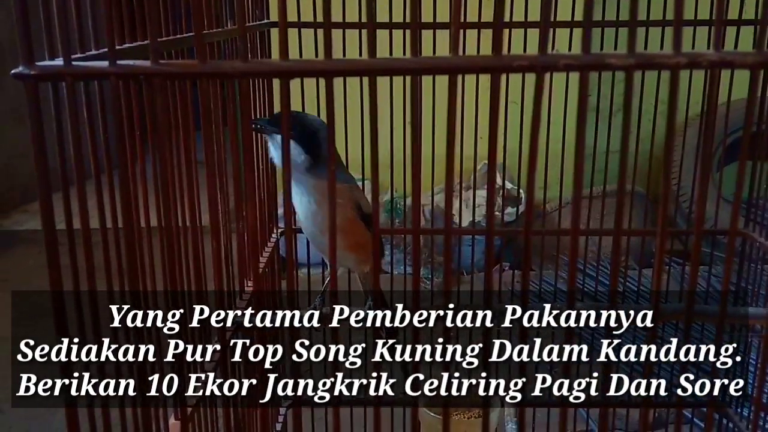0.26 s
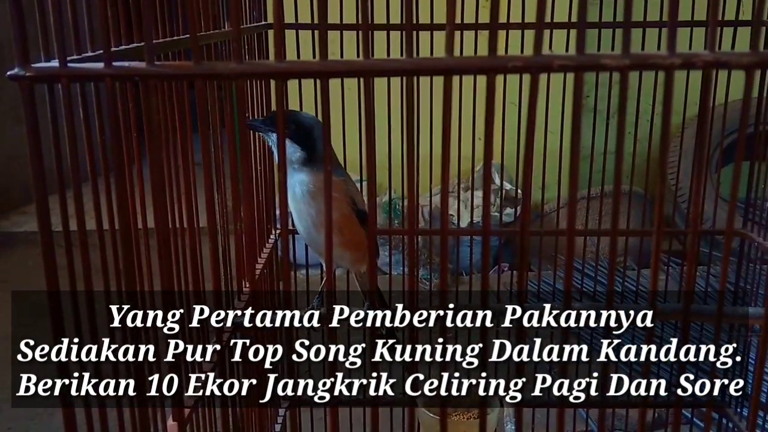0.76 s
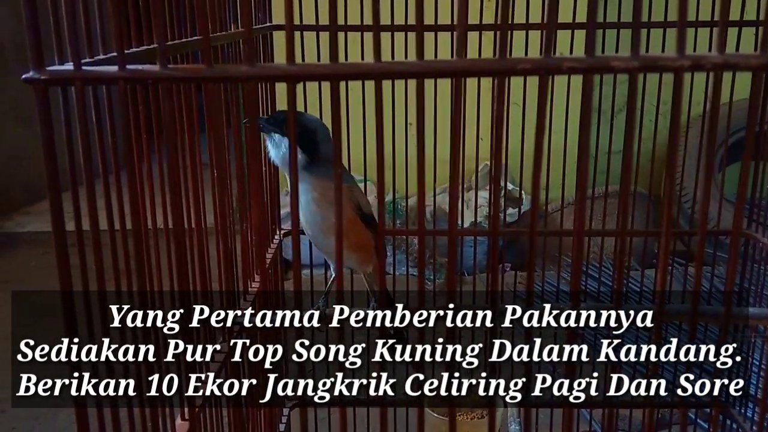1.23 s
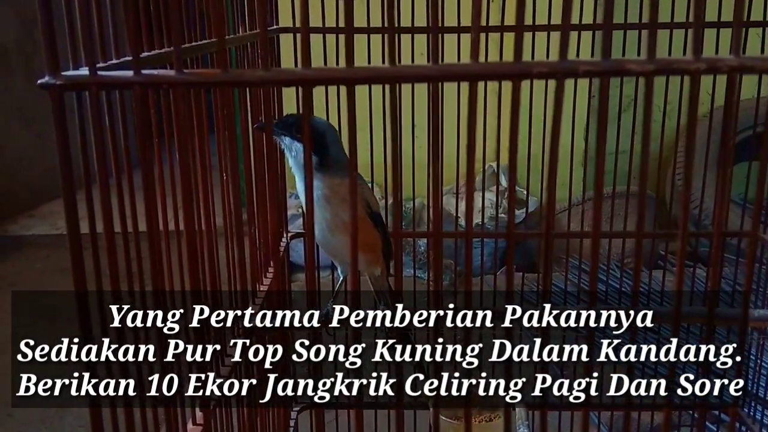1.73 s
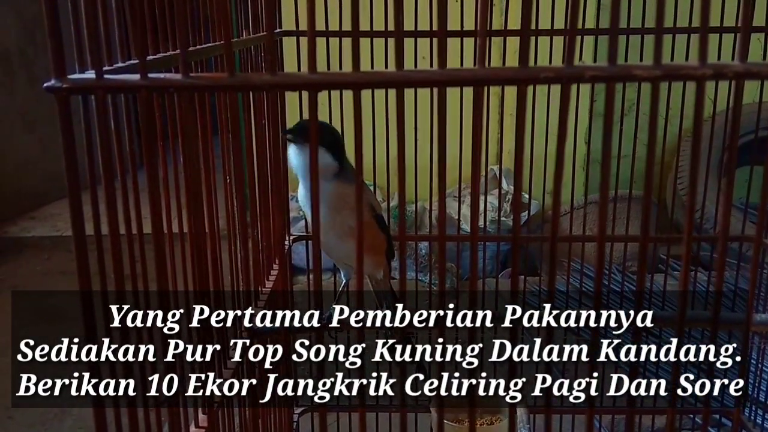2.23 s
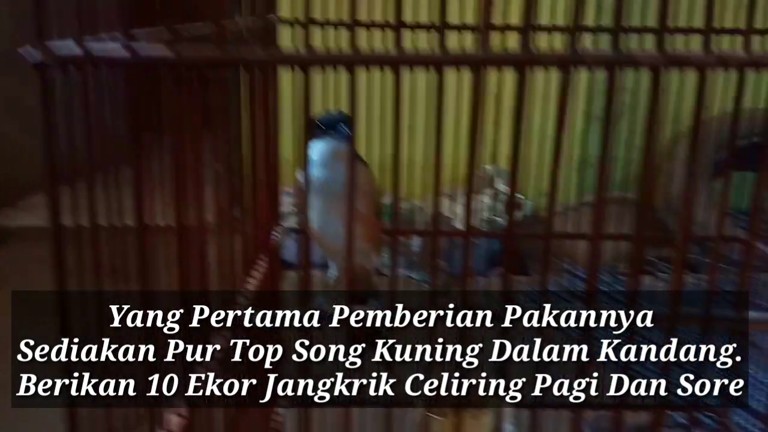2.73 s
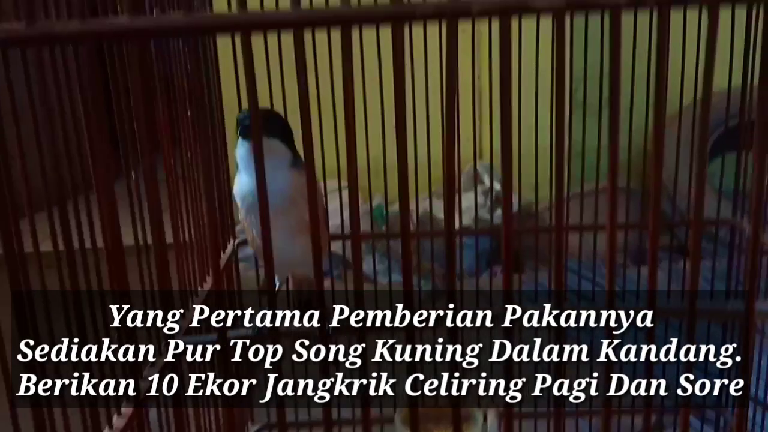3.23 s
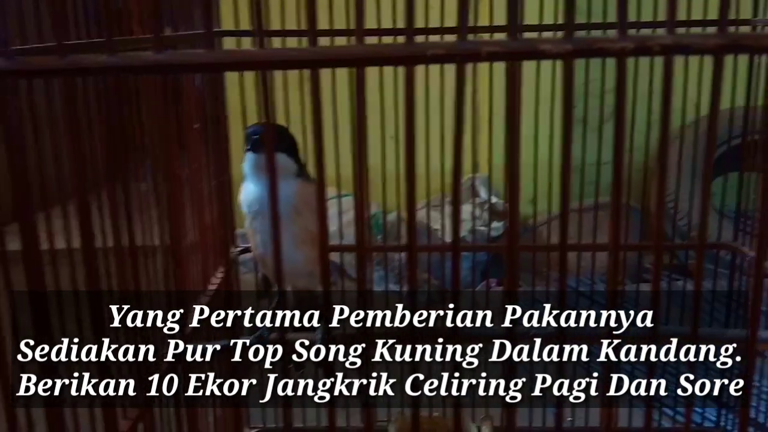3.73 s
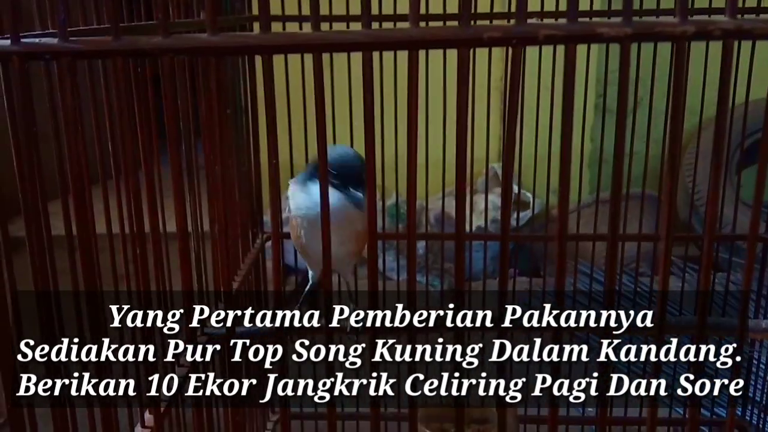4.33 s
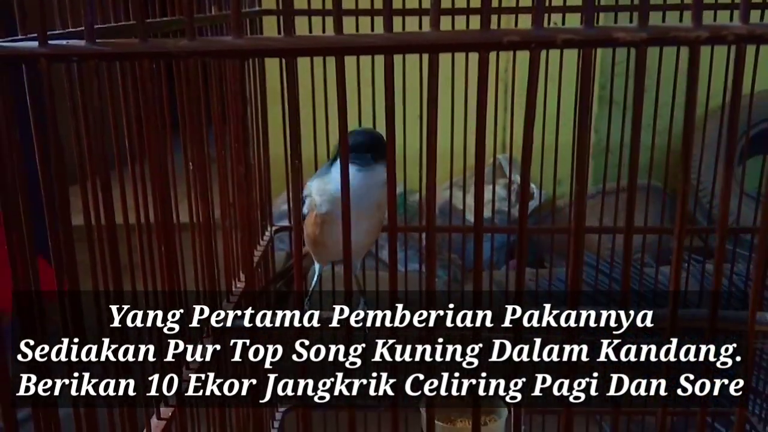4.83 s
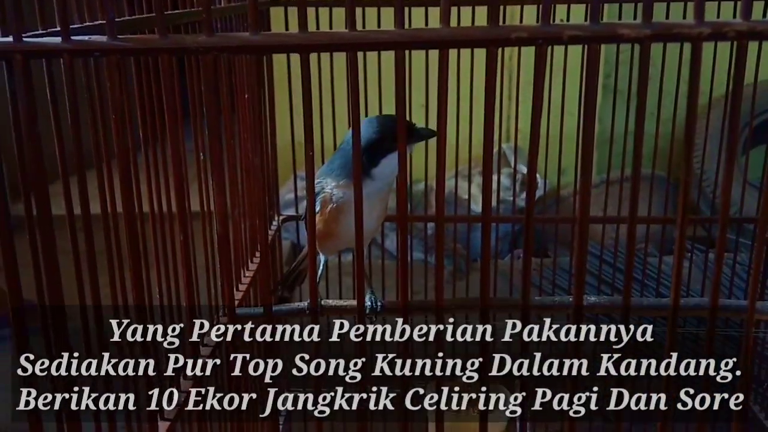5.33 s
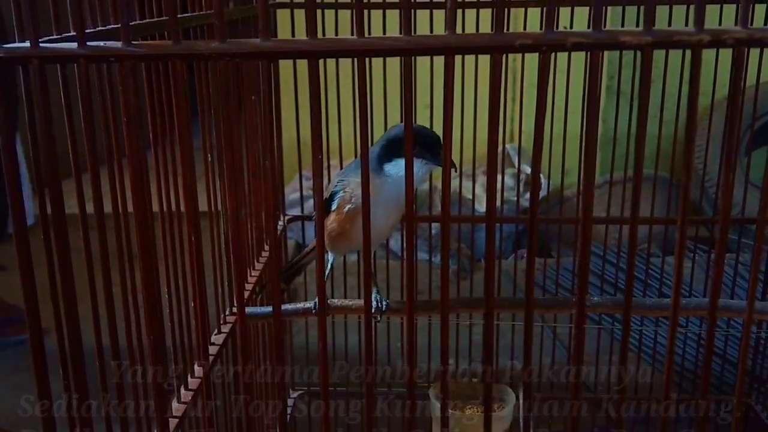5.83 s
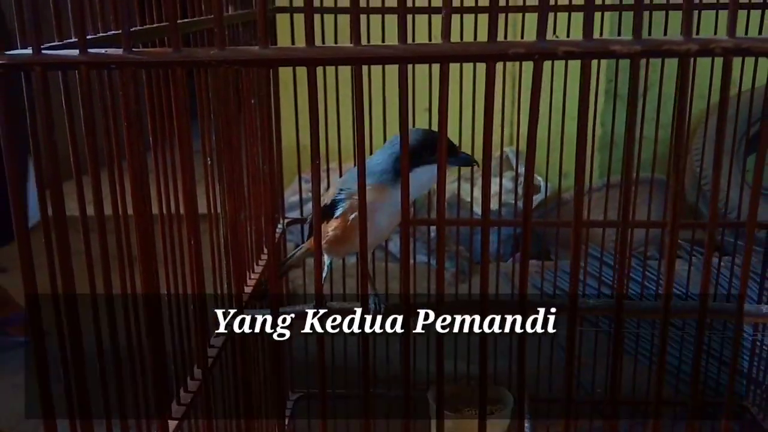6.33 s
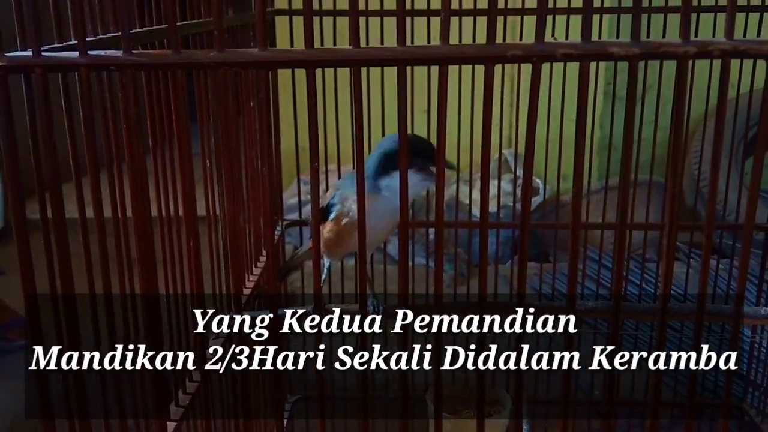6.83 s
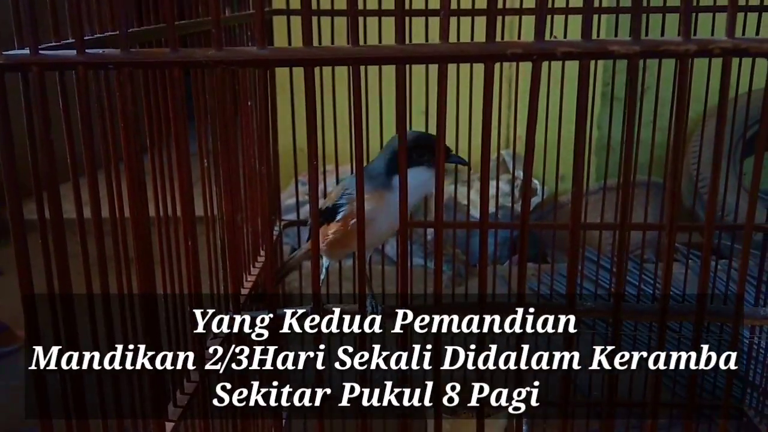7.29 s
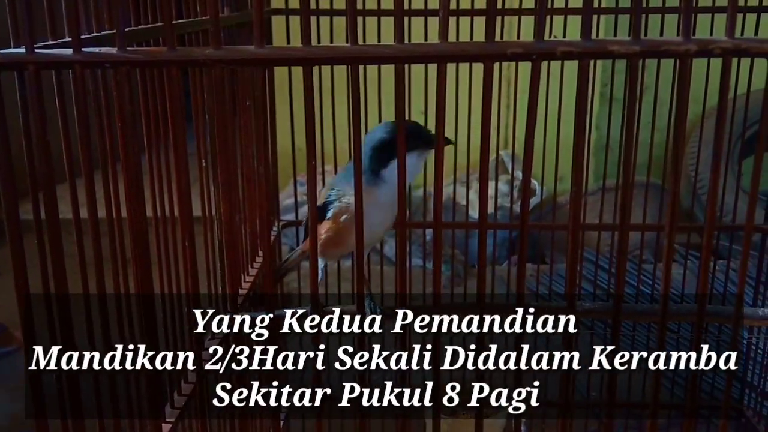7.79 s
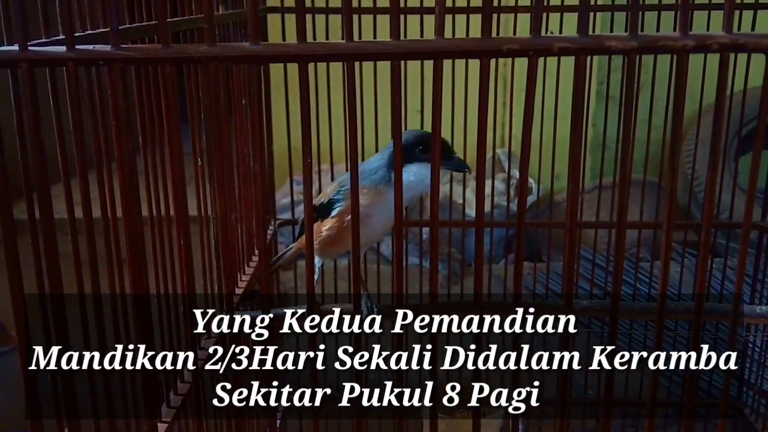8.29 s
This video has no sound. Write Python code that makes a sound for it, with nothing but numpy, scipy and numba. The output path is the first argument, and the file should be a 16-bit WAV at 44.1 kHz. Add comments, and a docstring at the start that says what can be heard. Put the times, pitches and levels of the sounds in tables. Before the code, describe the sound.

A caged shrike calls very close to a phone in a hard-walled room with steady low rumble. Four separated falling notes with scratchy tails come first, with distant whistles, chirps and harsh rasps between them. The wooden cage thuds and its bars rattle, then ten short nasal arched calls follow at fairly regular intervals, with a few thin high pips. The rumble dips under each loud call.

```python
"""A hard-walled room with a low rumble: a caged shrike calls close to a phone's microphone.
It gives four falling notes with scratchy tails, then ten arched, nasal ones: a buzz through a moving throat resonance.
Further off, gliding tones whistle and chirp and smeared tones rasp; noise bursts jolt the cage; thin pips come nearer.
The phone's gain control ducks the room's rumble under each call, and a limiter flattens the loudest notes."""
import sys
import numpy as np
from scipy import signal
from scipy.fft import rfft, irfft, next_fast_len
from scipy.io import wavfile
from numba import njit

SR = 44100
rng = np.random.default_rng(int(sys.argv[2]) if len(sys.argv) > 2 else 0)


def dump(signal):
    """Clip the signal to [-1, 1] and save it as 16-bit WAV at the path in sys.argv[1]."""
    limited = np.clip(np.atleast_2d(signal).T, -1, 1)
    pcm = np.round(limited * 32767).astype(np.int16)
    wavfile.write(sys.argv[1], SR, pcm)


N = 377055
TIME = np.arange(N) / SR

# Levels of single sounds are source levels, ahead of distance, room and gain control; spectra are relative.
# rumble of the surroundings: [f/Hz, level/dB]
RUMBLE_SPECTRUM = [(18, -40), (32, -26), (42, -5), (51, -7), (66, -2.5), (160, -0.5), (260, -6),
                   (420, -2.5), (780, -7.5), (1300, -14), (2400, -18.5), (4200, -21), (5700, -21.5),
                   (7000, -31), (10000, -37.5), (15000, -61)]
RUMBLE_DB = -26
# wavering hum tones: [centre f/Hz, level/dB]
HUM_TONES = [(68, -44), (134, -40.5), (190, -34), (339, -44), (560, -55.5)]
# short falling slurs of a bird further off: [t/s, length/s, level/dB]
SLURS = [(0, .02, -22.5), (.051, .058, -21), (0.513, .035, -20), (0.702, .054, -22.5), (0.898, .06, -20)]
# pitch of every slur: [first f/Hz, middle f/Hz, last f/Hz]
SLUR_HZ = (3454, 2950, 2480)
# the same bird's chirps: [t/s, level/dB]
CHIRPS = [(0.129, -9), (.481, -11.5)]
# a chirp's upstroke, thin top note and loud downstroke:
# [delay/s, length/s, first f/Hz, middle f/Hz, last f/Hz, level/dB added to the chirp's]
CHIRP_STROKES = [(0, 0.017, 3140, 4100, 5400, -8), (.004, 0.038, 5960, 6440, 6300, -7),
                 (0.026, 0.039, 5240, 4550, 4320, 1)]
# soft rustles: [t/s, length/s, level/dB]
RUSTLES = [(0.045, 0.18, -24)]
# scratch of turbulent air in a rough note: [f/Hz, level/dB]
SCRATCH_SPECTRUM = [(800, -31), (2000, -24), (3100, 5), (4700, 5), (7000, -5), (9800, -4), (11600, -7.5),
                    (13500, -22), (15200, -11.5), (16500, -37)]
# level of the syrinx's harmonics before the throat: [f/Hz, level/dB]
SYRINX_SPECTRUM = [(900, 0.5), (1700, -3), (2400, -1.5), (3700, -2), (4600, -1), (5200, 2), (6000, -2),
                   (7500, -1), (9500, -6)]
# smeared high overtones: [multiple of the pitch, level/dB]
SIZZLE_PARTS = [(9.8, 0.5), (12.9, -2)]
# falling notes: [t/s, tone length/s, whole length/s, nominal pitch f/Hz, level/dB, tail level/dB re the tone,
# throat resonance as a multiple of the pitch]
FALLING_NOTES = [(0.195, .105, 0.23, 1136, 2, -12.5, 2.76), (1.082, 0.1, 0.22, 1126, 3, -10.5, 3.06),
                 (2.159, .096, .225, 1142, -1, -6.5, 3.02), (3.003, 0.095, .22, 1106, 2, -11, 3.17)]
# harsh calls from further off: [t/s, length/s, first f/Hz, last f/Hz, level/dB, fullest at share of the length]
RASPS = [(0.844, 0.39, 4130, 3220, -18, 0.27), (1.436, 0.44, 3678, 2987, -18.5, 0.26),
         (3.664, 0.63, 3248, 3106, -20.5, 0.045), (5.649, 0.36, 3450, 2975, -26, 0.32),
         (6.562, 0.33, 2830, 2613, -29.5, 0.2), (7.487, 0.14, 2410, 2310, -27, 1)]
# hiss around a harsh call: [f/Hz, level/dB]
RASP_HISS_SPECTRUM = [(1500, -26), (2600, -11), (3100, -1.5), (4200, -3), (5200, -18.5), (6200, -10.5),
                      (7500, -28), (11000, -23.5), (12600, -41)]
# jolts of the cage: [t/s, frame thud level/dB, bar rattle level/dB, decay/s, thud tilt/dB per octave]
JOLTS = [(2.432, -10, -10, 0.074, 2), (2.462, -2.5, -5.5, 0.06, 6), (2.608, -15.5, -34, 0.086, -14),
         (2.724, -8.5, -10.5, 0.061, -4), (2.755, -2.5, -8.5, 0.064, -6), (2.856, -11.5, -39, 0.084, -19),
         (2.965, -12, -20, 0.042, -5), (3.232, -18, -17.5, 0.03, 1)]
# resonances of the cage's wooden frame: [f/Hz, width/Hz, level/dB]
FRAME_MODES = [(79.6, 18, -7), (141, 27, 12), (201, 57, 12), (343, 100, 6), (532, 39, 6.5), (850, 39, -10),
               (1190, 120, -32)]
# rattle of the cage's bars: [f/Hz, level/dB]
BAR_SPECTRUM = [(400, -7.5), (700, -23), (1400, -16.5), (1900, -17), (2300, -8), (2900, -11), (3900, -6.5),
                (5200, -12.5), (7500, -17), (10000, -26), (12000, -53), (15500, -52)]
# arched notes: [t/s, crest after t/s, hold past the crest/s, whole length/s, nominal pitch f/Hz, level/dB,
# tail level/dB re the tone, first throat f/Hz, widest throat f/Hz, roughness of the tone 0-1]
ARCHED_NOTES = [(4.058, 0.077, 0.017, 0.19, 1179, -4, -6.5, 2426, 4240, 0.31),
                (4.522, 0.082, .03, .2, 1203, -4.5, -5.5, 2344, 4440, 0.41),
                (4.887, 0.075, 0.027, .175, 1106, -2.5, -14, 3080, 3960, 0.28),
                (5.479, .078, 0.024, .2, 1201, -3.5, -6.5, 2330, 4300, 0.32),
                (5.95, 0.083, .028, .2, 1195, -4.5, -7.5, 2280, 4285, 0.35),
                (6.38, 0.081, 0.027, .175, 1138, -3.5, -7.5, 3080, 4050, 0.25),
                (6.782, 0.073, .028, .175, 1098, -3, -10.5, 2965, 3865, .2),
                (7.205, .076, 0.036, 0.19, 1151, -4.5, -13, 2444, 4430, 0.27),
                (7.594, .081, 0.031, .18, 1137, -3, -11.5, 2666, 4270, 0.24),
                (8.179, 0.079, 0.025, .2, 1168, -3.5, -5, 2360, 4270, 0.19)]
# thin, pure pips from a nearer bird: [t/s, length/s, first f/Hz, middle f/Hz, last f/Hz, level/dB]
PIPS = [(4.85, 0.04, 5640, 6060, 5880, -20), (4.98, 0.12, 5900, 5780, 5810, -27.5),
        (5.126, 0.044, 5300, 5490, 5740, -17.5), (5.242, 0.0445, 5280, 5370, 5450, -16),
        (5.33, 0.041, 5260, 5340, 5470, -15.5)]
# first bounces off the cage's tray and bars, some inverted: [delay/s, signed gain]
BOUNCES = [(.00164, -.08), (.00194, -.15), (.00253, -.12), (.00311, .08), (.0054, .13), (.00637, -.12)]

# a falling note starts sharp, settles and keeps sagging (shares of the pitch)
FALL_FLICK, FALL_SETTLE_S, FALL_SAG_PER_S = .22, .021, 1.05
FALL_SAG_FROM_S = .04  # where the sag passes the nominal pitch
FALL_TAIL_THROAT_HZ = 2624
FALL_THROAT_RISE = .1  # added to the throat's multiple at the harsh start, as a share
# an arched note flicks down, lifts with the opening beak and sags after its hold (shares of the pitch)
ARCH_FLICK, ARCH_SETTLE_S, ARCH_LIFT, ARCH_SAG_PER_S = .42, .015, 0.11, 3.8
# the beak opens and shuts around the crest; the note swells with it
OPEN_S, SHUT_S, SHUT_THROAT_HZ, SWELL_DB = .036, .04, 2220, 10
# just past the crest the voice catches and turns hoarse
CATCH_S, CATCH_WIDTH_S, CATCH_DB = .013, 0.0044, -11.5
FULL_SCALE, TOP_HZ = .72, 15500  # the phone's limiter ceiling and upper band edge


def undb(db):
    """Decibels to gain."""
    return 10 ** (np.asarray(db) / 20)


def unit(x):
    """Scale to rms 1."""
    return x / np.sqrt(np.mean(x ** 2) + 1e-18)


def add(out, s, x):
    """Mix x into out from time s."""
    i = max(int(s * SR), 0)
    out[i:i + len(x)] += x[:N - i]


def gain_at(points, hz):
    """Read a (f/Hz, level/dB) spectrum as gain."""
    f, db = np.transpose(points)
    return undb(np.interp(np.log(hz + 1), np.log(f), db))


def colour(x, points):
    """Filter by a (f/Hz, level/dB) spectrum."""
    gain = gain_at(points, np.fft.rfftfreq(len(x), 1 / SR))
    return irfft(rfft(x) * gain, len(x))


def wobble(n, hz):
    """Random motion of spread about 1, mostly slower than hz."""
    size = next_fast_len(n + 2000, True)
    f = np.fft.rfftfreq(size, 1 / SR)
    spectrum = rfft(rng.standard_normal(size)) / (1 + (f / hz) ** 4)
    return unit(irfft(spectrum, size))[:n]


def turns(hz):
    """Phase in radians of a tone with moving pitch."""
    return 2 * np.pi * np.cumsum(hz) / SR


def resonate(x, hz, width_hz):
    """One resonance, gain 1 at its centre."""
    b, a = signal.iirpeak(min(hz, .45 * SR), hz / width_hz, SR)
    return signal.lfilter(b, a, x)


def ramp(t, start_s, length_s):
    """Rise from 0 to 1 over length_s."""
    return np.clip((t - start_s) / length_s, 0, 1)


def background(waver_db=1):
    """Steady rumble of the surroundings as coloured noise, with hum tones that waver in pitch and level."""
    noise = rng.standard_normal(next_fast_len(N, True))
    rumble = unit(colour(noise, RUMBLE_SPECTRUM))[:N]
    rumble *= undb(RUMBLE_DB + waver_db * wobble(N, 28))
    hum = np.zeros(N)
    for hz, db in HUM_TONES:
        hum += undb(db) * unit(np.sin(turns(hz + 5 * wobble(N, 7.75))))
    return rumble + hum * (1 + 0.21 * wobble(N, 19))


def far_glides():
    """Every slur and every stroke of the distant chirps, as pitch glides."""
    glides = [(s, length, *SLUR_HZ, db) for s, length, db in SLURS]
    for s, db in CHIRPS:
        for delay, *glide, stroke_db in CHIRP_STROKES:
            glides.append((s + delay, *glide, db + stroke_db))
    return glides


def whistles(glides, quaver, octave_db):
    """Curved glides of a tone and its octave; the wider the sweep, the more the tone quavers."""
    out = np.zeros(N)
    for s, length, first_hz, middle_hz, last_hz, db in glides:
        u = np.linspace(0, 1, int(length * SR))
        curve = np.polyfit([0, .5, 1], [first_hz, middle_hz, last_hz], 2)
        hz = np.polyval(curve, u)
        depth = 2 * quaver * np.sqrt(np.ptp(hz) / middle_hz)
        phase = turns(hz * (1 + depth * wobble(len(u), 440)))
        tone = np.sin(phase) + undb(octave_db) * np.sin(2 * phase)
        add(out, s, undb(db) * unit(tone * np.sqrt(u * (1 - u))))
    return out


def room(x, t60_s, treble_t60_s, build_s=0.0067):
    """Diffuse echo of unit energy off the hard walls; treble above 6 kHz dies sooner."""
    t = TIME[:SR]
    low_pass = signal.butter(2, 6000, fs=SR, output="sos")
    high_pass = signal.butter(2, 6000, "high", fs=SR, output="sos")
    low = signal.sosfilt(low_pass, rng.standard_normal(len(t)))
    high = signal.sosfilt(high_pass, rng.standard_normal(len(t)))
    tail = low * np.exp(-np.log(1000) * t / t60_s)
    tail += high * np.exp(-np.log(1000) * t / treble_t60_s)
    tail *= 1 - np.exp(-t / build_s)
    return signal.fftconvolve(x, tail / np.linalg.norm(tail))[:N]


def rustles():
    """A brief airy swell of brightened noise."""
    out = np.zeros(N)
    for s, length, db in RUSTLES:
        n = int(length * SR)
        airy = np.diff(colour(rng.standard_normal(n + 1), SCRATCH_SPECTRUM))
        add(out, s, undb(db) * np.hanning(n) * unit(airy))
    return out


def envelope(t, attack_s, hold_s, release_s, tail_db, fade_db_per_s, quiet_db, stop_s):
    """Level in dB: attack, hold, release to a weaker tail that fades and stops."""
    edges = 1 - ramp(t, 0, attack_s) + ramp(t, t[-1] - stop_s, stop_s)
    fade = fade_db_per_s * np.maximum(t - hold_s, 0)
    return quiet_db * edges + tail_db * ramp(t, hold_s, release_s) - fade


def note(hz, db, throat_hz, rough, leak_db, scratch_db, sizzle_db, jitter=0.0754, jitter_hz=520, shimmer=0.58,
         throat_half_width_hz=460, air_db=-9, sizzle_width_hz=650):
    """The syrinx buzzes through a moving throat resonance; when rough, its cycles turn uneven and hiss."""
    n, rough = len(hz), np.clip(rough, 0, 1)
    hz = hz * (1 + .017 * wobble(n, 130))
    phase = turns(hz * (1 + jitter * rough * wobble(n, jitter_hz)))
    k = np.arange(1, 8)[:, None]  # harmonic numbers
    throat = 1 / (1 + ((k * hz - throat_hz) / throat_half_width_hz) ** 2)
    gains = gain_at(SYRINX_SPECTRUM, k * hz) * (undb(leak_db) + throat)
    gains /= np.sqrt(np.sum(gains ** 2, axis=0) / 2)
    buzz = np.sum(gains * np.sin(k * phase), axis=0)
    buzz *= 1 + shimmer * rough * wobble(n, 470)
    air = undb(air_db) * 2 * wobble(n, 450) * np.sin(turns(throat_hz * 1.06))
    puffs = rng.standard_normal(n) * (1 + np.cos(phase))
    scratch = undb(scratch_db) * unit(colour(puffs, SCRATCH_SPECTRUM))
    effort = undb(db + 1.65 * wobble(n, 37))
    # high overtones sizzle in gritty bursts, rising and falling with the pitch
    pitch_phase = turns(hz)
    sizzle = np.zeros(n)
    for multiple, part_db in SIZZLE_PARTS:
        sizzle += undb(part_db) * wobble(n, sizzle_width_hz) * np.sin(multiple * pitch_phase)
    sizzle *= undb(sizzle_db + 2.9 * wobble(n, 90))
    # turbulence fades faster than the tone as the effort drops
    turbulence = air + scratch * np.sqrt(np.minimum(effort, 1))
    return (buzz * (1 - rough / 2) + rough * turbulence + sizzle) * effort


def falling_note(tone_s, length_s, pitch_hz, db, tail_db, throat_ratio, harsh_s=.035, clear_s=0.0401,
                 tone_rough=0.18, harsh_rough=0.472, accent_db=3):
    """A harsh start clears into a sinking tone, which breaks into a scratchy tail."""
    t = TIME[:int(length_s * SR)]
    sag = 1 - FALL_SAG_PER_S * (np.minimum(t, tone_s) - FALL_SAG_FROM_S)
    hz = pitch_hz * (sag + FALL_FLICK * np.exp(-t / FALL_SETTLE_S))
    harsh = 1 - ramp(t, harsh_s, clear_s)
    broken = ramp(t, tone_s - .008, .025)
    tone_throat_hz = throat_ratio * pitch_hz * (sag + FALL_THROAT_RISE * harsh)
    throat_hz = tone_throat_hz * (1 - broken) + FALL_TAIL_THROAT_HZ * broken
    level = db + accent_db * harsh
    level += envelope(t, attack_s=0.024, hold_s=tone_s - .008, release_s=.016, tail_db=tail_db,
                      fade_db_per_s=31, quiet_db=-16.5, stop_s=0.034)
    rough = tone_rough + harsh_rough * harsh + broken
    return note(hz, level, throat_hz, rough, leak_db=-32, scratch_db=-2.5 - 12.0 * broken,
                sizzle_db=-24 - 3.3 * broken)


def rasps(chaos=0.0997, chaos_hz=600, second_db=-21, third_db=-25, hiss_db=-3, start_db=-8, end_db=-15, edge_db=-14):
    """A chaotic syrinx smears one tone and its overtones into a scratchy hiss."""
    out = np.zeros(N)
    for s, length, first_hz, last_hz, db, fullest in RASPS:
        n = int(length * SR)
        u = np.linspace(0, 1, n)
        glide_hz = first_hz + (last_hz - first_hz) * u
        phase = turns(glide_hz * (1 + chaos * wobble(n, chaos_hz)))
        tone = np.sin(phase) + undb(second_db) * np.sin(2 * phase) + undb(third_db) * np.sin(3 * phase)
        hiss = colour(rng.standard_normal(n), RASP_HISS_SPECTRUM)
        # the throat follows the final pitch and weakens what lies far below it
        throat = [(0.44 * last_hz, edge_db), (1.07 * last_hz, 3), (1.0 * last_hz, -2), (1.9 * last_hz, 3)]
        voice = colour(unit(tone) + undb(hiss_db) * unit(hiss), throat)
        swell_db = np.interp(u, [0, np.clip(fullest, .05, .95), 1], [start_db, 2, end_db])
        add(out, s, voice * undb(db + swell_db) * (1 + .5 * wobble(n, 125)))
    return out


def cage(grain_db=3, rise_s=0.012):
    """Each jolt sets the bars chattering and the wooden frame booming."""
    out, t = np.zeros(N), TIME[:SR // 2]
    for s, thud_db, rattle_db, decay_s, tilt in JOLTS:
        fade = np.exp(-t / decay_s) * (1 - np.exp(-t / rise_s))
        chatter = rng.standard_normal(len(t)) * undb(grain_db * wobble(len(t), 160))
        push = rng.standard_normal(len(t))
        boom = np.zeros(len(t))
        for hz, width_hz, db in FRAME_MODES:
            boom += undb(db + tilt * np.log2(hz / 300)) * resonate(push, hz, width_hz)
        thud = undb(thud_db) * unit(boom)
        rattle = undb(rattle_db) * unit(colour(chatter, BAR_SPECTRUM))
        add(out, s, fade * (thud + rattle))
    return out


def arched_note(crest_s, past_s, length_s, pitch_hz, db, tail_db, first_hz, widest_hz, tone_rough,
                clear_s=0.042, harsh_rough=0.58, hoarse=.5, hoarse_db=-2):
    """The beak opens and shuts once, lifting pitch, throat resonance, level and sizzle together."""
    t = TIME[:int(length_s * SR)]
    rising, hold_s, catch_s = t < crest_s, crest_s + past_s, crest_s + CATCH_S
    opening = np.exp(-((t - crest_s) / np.where(rising, OPEN_S, SHUT_S)) ** 2)
    caught = ramp(t, catch_s, CATCH_WIDTH_S)
    flick = ARCH_FLICK * np.exp(-(t / ARCH_SETTLE_S) ** 2)
    sag = ARCH_SAG_PER_S * np.maximum(t - hold_s, 0)
    hz = pitch_hz * (1 + flick + ARCH_LIFT * opening - sag)
    throat_hz = widest_hz * opening + np.where(rising, first_hz, SHUT_THROAT_HZ) * (1 - opening)
    catch_dip_db = CATCH_DB * np.exp(-((t - catch_s) / CATCH_WIDTH_S) ** 2)
    level = db + SWELL_DB * opening + catch_dip_db + hoarse_db * caught
    level += envelope(t, attack_s=0.014, hold_s=hold_s, release_s=0.033, tail_db=tail_db,
                      fade_db_per_s=69, quiet_db=-10.5, stop_s=.02)
    rough = tone_rough + harsh_rough * (1 - ramp(t, 0, clear_s)) + hoarse * caught
    return note(hz, level, throat_hz, rough, leak_db=-32.5, scratch_db=-9 - 1.7 * caught,
                sizzle_db=-22 + 3.5 * opening - 3.8 * caught)


def shrike():
    """The close bird's two kinds of note, each a little different every time."""
    out = np.zeros(N)
    for sing, rows in ((falling_note, FALLING_NOTES), (arched_note, ARCHED_NOTES)):
        for s, *row in rows:
            add(out, s, sing(*row))
    return out


def scene(near_room_db=-18, near_flutter_db=-13, far_direct_db=-5, far_room_db=-1, pip_room_db=-3):
    """The shrike and its cage are close and fairly dry; the far birds arrive mostly by the walls."""
    near = shrike() + cage()
    pips = whistles(PIPS, quaver=0.045, octave_db=-39)
    far = whistles(far_glides(), quaver=0.036, octave_db=-23.0) + rasps() + rustles()
    direct = near + pips + undb(far_direct_db) * far
    direct += undb(near_flutter_db) * room(near, t60_s=0.083, treble_t60_s=0.016)
    direct += undb(near_room_db) * room(near, t60_s=0.56, treble_t60_s=0.36)
    distant = far + undb(pip_room_db) * pips
    direct += undb(far_room_db) * room(distant, t60_s=0.71, treble_t60_s=0.54)
    out = direct + background()
    for delay_s, gain in BOUNCES:
        add(out, delay_s, gain * direct)
    return out[None]


@njit
def follow(x, attack, release):
    """Envelope that rises and falls at its own rates (share of the gap closed per sample)."""
    out, e = np.empty(len(x)), 0.
    for i in range(len(x)):
        e += (x[i] - e) * (attack if x[i] > e else release)
        out[i] = e
    return out


def record(dry, threshold_db=-4.5, attack_s=0.0044, release_s=0.043, makeup_db=2.0):
    """Gain control ducks the room under each note; a fast limiter flattens the peaks that slip past it."""
    loudness = follow(np.abs(dry[0]), 1 / (attack_s * SR), 1 / (release_s * SR))
    ducking = np.sqrt(1 + (loudness / undb(threshold_db)) ** 2)
    x = dry[0] / ducking * undb(makeup_db)
    peak = follow(np.abs(x), .3, 1 / (.002 * SR))
    x = np.clip(x / np.maximum(peak / FULL_SCALE, 1), -FULL_SCALE, FULL_SCALE)
    band_edge = signal.ellip(12, .1, 80, TOP_HZ, fs=SR, output="sos")  # steep low-pass
    return signal.sosfilt(band_edge, x)[None]


dry = scene()
out = record(dry)
dump(out)
```